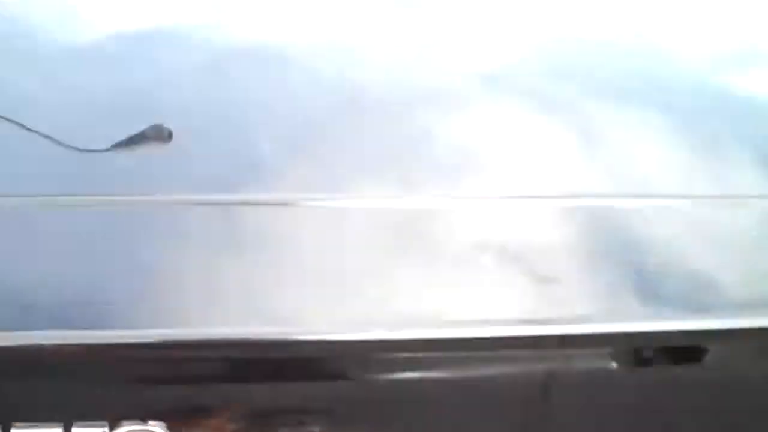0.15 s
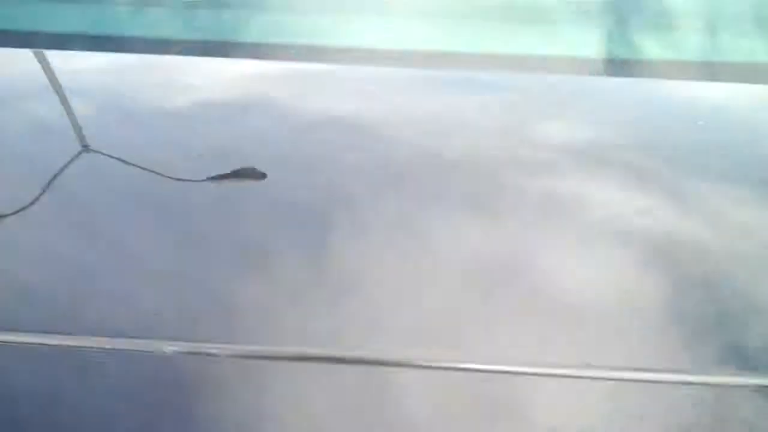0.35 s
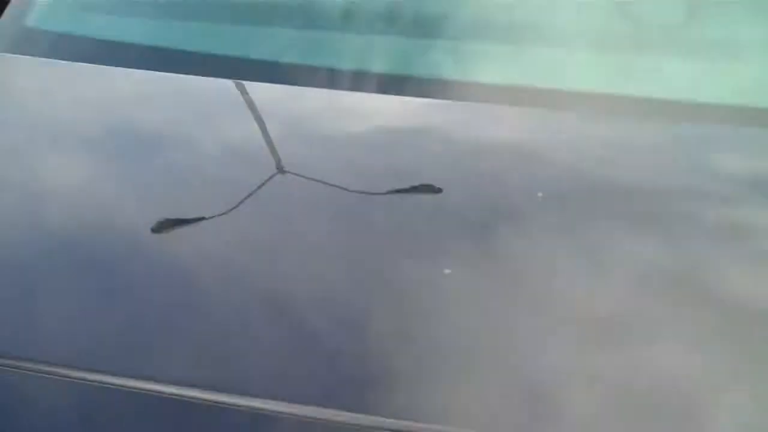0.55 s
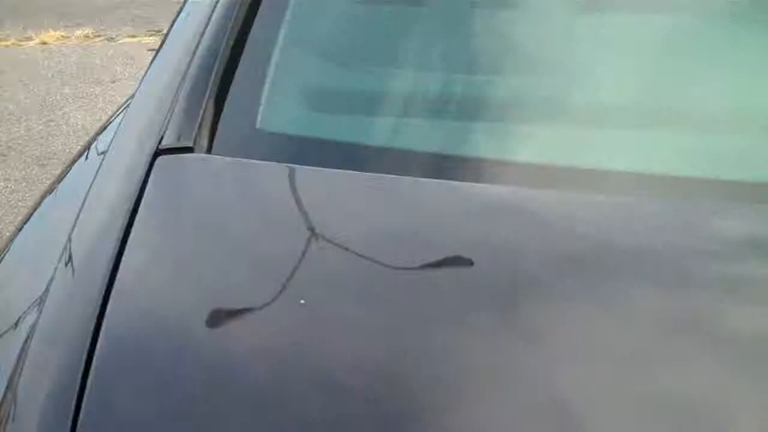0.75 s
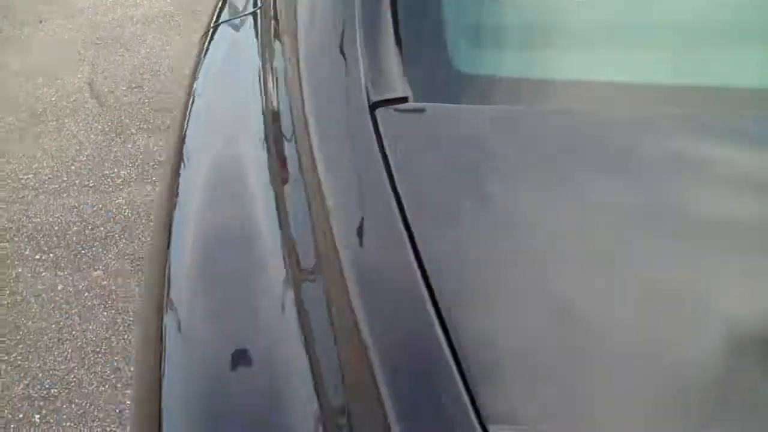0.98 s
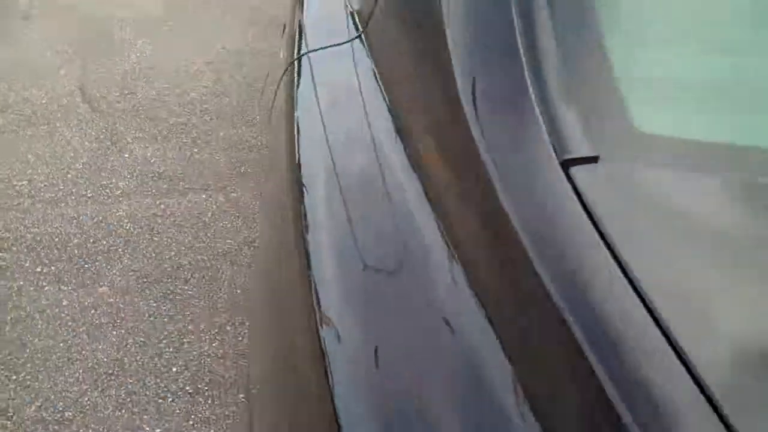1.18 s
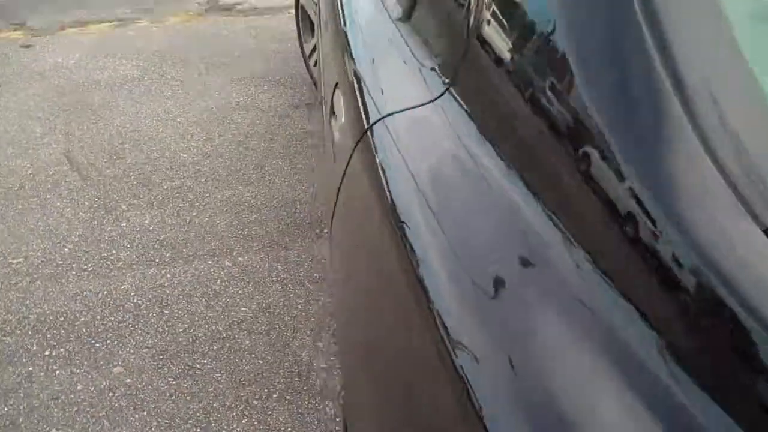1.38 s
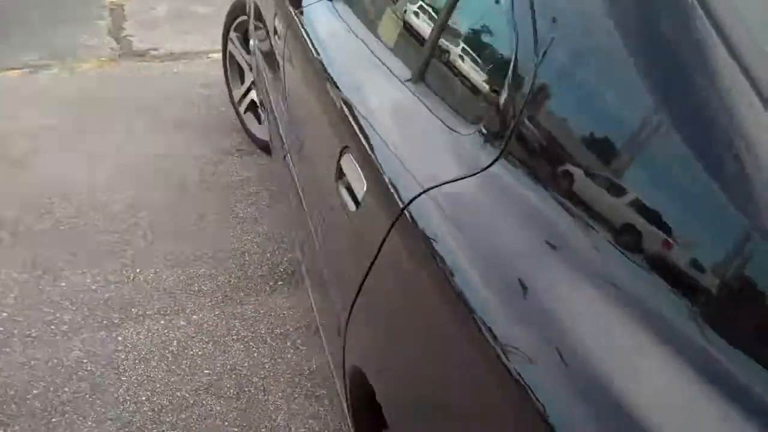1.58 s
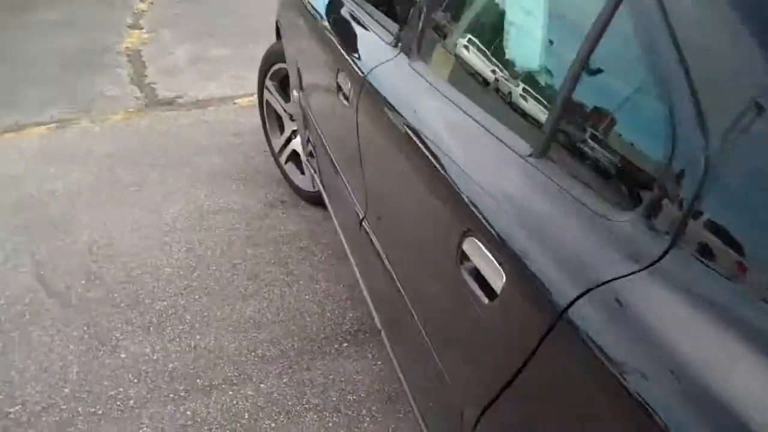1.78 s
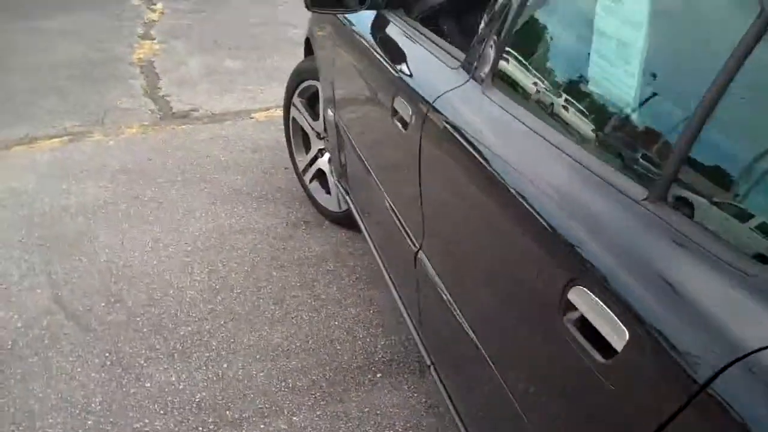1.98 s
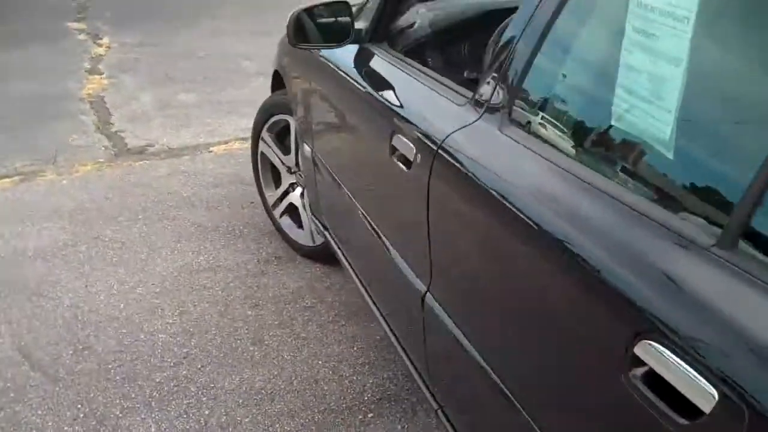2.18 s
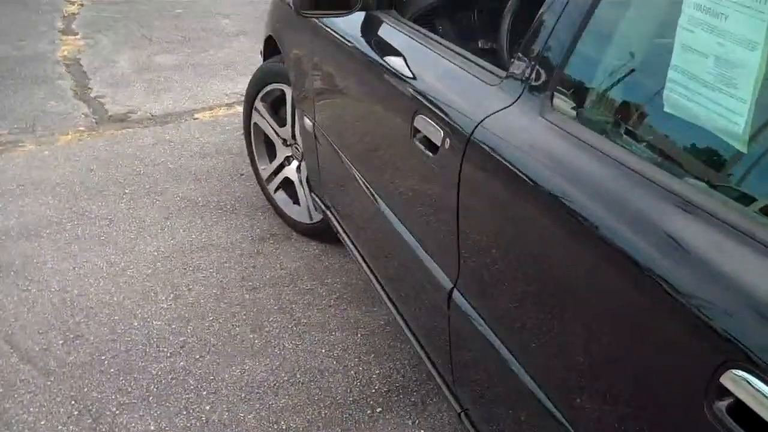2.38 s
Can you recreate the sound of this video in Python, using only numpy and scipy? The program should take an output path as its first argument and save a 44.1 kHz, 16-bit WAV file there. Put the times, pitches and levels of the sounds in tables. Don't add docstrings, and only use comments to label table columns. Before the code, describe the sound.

A car trunk lid slams shut with one loud, heavy metallic thump in an open parking lot

```python
import sys
import numpy as np
from scipy import signal
from scipy.io import wavfile
from scipy.ndimage import uniform_filter1d

SR = 44100
rng = np.random.default_rng(int(sys.argv[2]) if len(sys.argv) > 2 else 0)


def log_audio(samples):
    frames = np.atleast_2d(samples).T
    limited = np.clip(frames, -1, 1)
    pcm = np.round(limited * 32767).astype(np.int16)
    wavfile.write(sys.argv[1], SR, pcm)


def linear_from_db(decibels):
    return 10 ** (np.asarray(decibels, float) / 20)


N = 108045

# frequency in Hz, likeness from -1 to 1.
AIR_LIKENESS = [(60, 0.79), (180, 0.93), (530, 0.96), (1580, 0.71), (4710, -0.031), (14000, 0.02)]
# frequency in Hz, left minus right in dB.
AIR_BALANCE = [(60, -3), (180, -0.5), (530, 0.5), (1580, -1.5), (4710, 0.5), (14000, 16.5)]


def evened(x):
    return x / np.sqrt(np.mean(x ** 2) + 1e-20)


def read(points, hz):
    f, value = np.transpose(points)
    return np.interp(np.log(hz + 1), np.log(f + 1), value)


def add(mix, start_s, sound):
    part = mix[..., round(start_s * SR):][..., :sound.shape[-1]]
    part += sound[..., :part.shape[-1]]


def sides(pan_db):
    return linear_from_db(np.array([pan_db / 2, -pan_db / 2]))


def slow(rate_hz):
    t = np.arange(N) / SR
    drift = np.zeros(N)
    for hz in np.geomspace(rate_hz / 16, rate_hz, num=16):
        drift += np.sin(2 * np.pi * (hz * t + rng.random())) / np.sqrt(hz)
    return evened(drift)


def noise(colour, likeness, balance, patchy_db, size=1024):
    frames, hz = 4 * N // size + 5, np.fft.rfftfreq(size, 1 / SR)
    a, b, c, d, patches = rng.standard_normal((frames, len(hz), 5)).T
    patches = uniform_filter1d(patches, size=10, axis=0)
    patches = evened(uniform_filter1d(patches, size=10, axis=1))
    like = np.clip(read(likeness, hz), -1, 1)[:, None]
    left, other = a + 1j * b, c + 1j * d
    z = np.array([left, like * left + np.sqrt(1 - like ** 2) * other])
    z *= sides(read(balance, hz))[..., None]
    z *= linear_from_db(read(colour, hz)[:, None] + patchy_db * patches)
    return evened(signal.istft(z, nperseg=size, noverlap=3 * size // 4)[1][:, :N])


def traffic():
    # frequency in Hz, density in dB per Hz.
    wash_colour = [(24, -31), (40, -3), (260, -10), (430, -18.5), (1060, -18), (4000, -37), (5800, -35),
                   (9800, -54), (14200, -60.5), (14800, -85)]
    # time in seconds, loudness in dB.
    swell = [(0, 0.5), (.15, 1.5), (.5, 0.5), (.8, -1), (1.1, -0.5), (1.35, 0), (1.7, -0.5), (2.0, -0.5),
             (2.45, .5)]
    t = np.arange(N) / SR
    wash_db = -39.5 + np.interp(t, *np.transpose(swell)) + .3 * slow(9)
    wash = noise(wash_colour, AIR_LIKENESS, AIR_BALANCE, .8) * linear_from_db(wash_db)

    idle_hz = 30.8 * (1 + 0.025 * slow(3.3))
    idle = np.sin(2 * np.pi * np.cumsum(idle_hz) / SR) * linear_from_db(-39 - 3.1 * slow(1.7))

    hum_db = -56.5 + 3.6 * np.sin(2 * np.pi * 3.3 * t)
    hum_waver = 0.91 * np.sin(2 * np.pi * 6.5 * t)
    hum = linear_from_db(hum_db) * np.sin(2 * np.pi * 498 * t + hum_waver)
    return wash + hum + idle * sides(-4.5)[:, None]


def insects():
    # frequency in Hz, density in dB per Hz.
    chorus = [(5900, -13.5), (6300, 1.5), (7000, 0), (7600, 5.5), (7950, 2), (8200, -13), (9000, -17),
              (9600, -40.5)]
    band = [(100, -90), *chorus, (20000, -90)]
    hiss = noise(band, AIR_LIKENESS, AIR_BALANCE, 1.4, size=512)
    return hiss * linear_from_db(-48 + 0.5 * slow(90) + 1.4 * slow(9.4))


def ticks():
    # start in seconds, level in dB, lowest and highest frequency in Hz, left minus right in dB.
    clicks = [
        (.1565, -29, 5640, 8900, 10),
        (.1566, -46, 8900, 15100, 14),
        (0.162, -31.5, 5500, 9020, 0.5),
        (.175, -45, 9050, 14500, 12),
        (.187, -51, 10000, 14000, 11.5),
        (.2005, -29, 5000, 9600, 7),
        (1.4, -58, 4000, 12100, 15),
        (1.686, -54, 7000, 11000, 11),
        (1.921, -35, 2300, 6700, 0.5),
    ]
    out, t = np.zeros((2, N)), np.arange(2000) / SR
    t60_s = .009
    for start_s, db, low_hz, high_hz, pan_db in clicks:
        band = signal.butter(3, [low_hz, high_hz], "band", fs=SR, output="sos")
        impulse = 8 * (t == 0)
        a, b = (rng.standard_normal((2, len(t))) + impulse) * linear_from_db(-60 * t / t60_s)
        snap = signal.sosfilt(band, [a, 0.47 * a + 0.35 * b])
        add(out, start_s, linear_from_db(db + 6.5) * snap / abs(snap).max() * sides(pan_db)[:, None])
    return out


def seal():
    length_s, top_hz = 0.019, 2984
    out, t = np.zeros((2, N)), np.arange(0, length_s, 1 / SR)
    a, b = rng.standard_normal((2, len(t)))
    lowpass = signal.butter(2, top_hz, fs=SR, output="sos")
    squeeze = signal.sosfilt(lowpass, [a + 0.31 * b, a - 0.84 * b])
    add(out, .191, linear_from_db(-13.5) * evened(squeeze) * (t / length_s) ** 1.5)
    return out


def rattle(shudder):
    # frequency in Hz, density in dB per Hz.
    crash_colour = [(180, -37), (300, -6), (800, -7.5), (1100, -11.5), (2000, -13), (7800, -16.5),
                    (13500, -42.5), (14600, -50)]
    # frequency in Hz, left minus right in dB.
    crash_balance = [(60, -3.5), (500, -0.5), (4700, 1), (7000, 6), (8500, 7), (14000, 13.5)]
    # frequency in Hz, left-right likeness.
    crash_likeness = [(300, 0.99), (1000, .9), (3000, 0.69), (8000, 0.15)]
    # frequency in Hz, width in Hz, boost in dB.
    ports = [(7400, 970, 3), (12480, 660, 13)]
    hz = np.geomspace(100, 20000, num=200)
    colour = read(crash_colour, hz)
    for port_hz, width_hz, db in ports:
        colour = colour + db * np.exp(-((hz - port_hz) / width_hz) ** 2)
    grain = linear_from_db(1.7 * evened(uniform_filter1d(rng.standard_normal(N), size=60)))
    crash = noise(np.transpose([hz, colour]), crash_likeness, crash_balance, 4.1, size=256)
    return linear_from_db(1.5) * shudder * grain * crash


def ring(force, hz, t60_s):
    t = np.arange(SR // 2) / SR
    return signal.fftconvolve(force, linear_from_db(-60 * t / t60_s) * np.sin(2 * np.pi * hz * t))[:N]


def sheet_metal(force_knocks, shudder):
    # frequency in Hz, level in dB, 60 dB decay time in seconds.
    modes = [(56.3, -5, 0.17), (97, -4, 0.22), (187.4, -10, .3), (235.9, -3, 0.33), (271.4, -1, 0.2),
             (394.5, -4.5, 0.096), (450, -6.5, 0.063), (590, -14, 0.081), (666, 0, 0.073),
             (739.7, 2.5, .09), (858, -1, 0.057), (903, -2, .06), (1153, -4.5, .06), (1305, -4.5, 0.051)]
    out, lag_s = np.zeros((2, N)), .00008
    for hz, db, t60_s in modes:
        force = force_knocks * .5 + 0.017 * shudder * rng.standard_normal(N)
        mode = linear_from_db(db - 3) * ring(force, hz, t60_s)
        place = rng.uniform(-1, 1)
        late = np.interp(np.arange(N) - SR * lag_s * (1 + place), np.arange(N), mode)
        out += np.array([late, mode]) * sides(-0.5 * place - 0.6)[:, None]
    return out


def slam():
    # start in seconds,
    # knock in dB, rattle in dB, shudder length in seconds.
    blows = [(0.2046, -10, -21.5, 0.0047), (0.2087, -2.5, 2.5, 0.0087), (0.2147, 1, 2.5, .006),
             (.222, -1.5, -2.5, 0.0056), (0.229, -2, -8, 0.0056), (0.234, -7.5, -10.5, .005),
             (0.251, -7, -14, 0.0038), (.257, -9, -10, 0.004), (.27, -11.5, -12.5, .008),
             (0.283, -20.5, -26, .005), (.298, -24, -21, 0.0098), (.312, -22, -24.5, 0.0054),
             (0.341, -33.5, -30, 0.0098), (0.358, -23, -46, 0.013)]
    knocks, shudder, t = np.zeros(N), np.zeros(N), np.arange(4000) / SR
    for start_s, knock_db, rattle_db, length_s in blows:
        knocks[round(start_s * SR)] = linear_from_db(knock_db)
        rise = np.minimum(t / 0.00056, 1)
        add(shudder, start_s, linear_from_db(rattle_db) * rise * np.exp(-t / length_s))
    out = rattle(shudder) + sheet_metal(knocks, shudder)

    push_hz, push_s = 68.2, .2095
    u = (t - .008) * 2 * np.pi * push_hz
    push = linear_from_db(0.5) * u * np.exp(-u ** 2 / 2)
    add(out, push_s - .003, push * np.ones((2, 1)))
    return out


def lot(x):
    # frequency in Hz, 60 dB decay time in seconds.
    decay = [(100, 0.77), (500, 0.25), (2000, 0.22), (10000, .16)]
    taps = np.zeros((2, SR // 2))
    slots = np.arange(400, SR // 2 - 20, 20)
    at = slots + rng.integers(0, 20, (2, len(slots)))
    np.put_along_axis(taps, at, rng.choice([-1., 1.], at.shape), axis=1)
    taps = taps + 1.3 * taps[::-1]
    hz, t, z = signal.stft(taps, SR, nperseg=256)
    fade = linear_from_db(-60 * t / read(decay, hz)[:, None])
    tail = signal.istft(z * fade, SR, nperseg=256)[1]
    return signal.fftconvolve(x, tail / np.linalg.norm(tail[0]), axes=1)[:, :N]


def birds():
    # start in seconds, length in seconds, level in dB, start and end frequency in Hz.
    whistles = [
        (.505, .025, -54, 2480, 2450),
        (1.66, .12, -59, 6450, 6300),
        (1.965, .035, -60, 3150, 3200),
        (2.16, .035, -61, 3800, 3800),
        (2.215, .03, -62, 3800, 3850),
        (2.255, .045, -61, 4080, 4200),
        (2.315, .065, -58, 4250, 4330),
        (2.385, .03, -63, 4350, 4420),
        (2.39, .055, -53, 2950, 3080),
    ]
    out = np.zeros((2, N))
    for start_s, length_s, db, start_hz, end_hz in whistles:
        t = np.arange(0, length_s, 1 / SR)
        waver = 1 + .003 * np.sin(2 * np.pi * 45 * t)
        hz = (start_hz + (end_hz - start_hz) * t / length_s) * waver
        swell = np.sin(np.pi * t / length_s) ** 0.41
        whistle = linear_from_db(db) * swell * np.sin(2 * np.pi * np.cumsum(hz) / SR)
        add(out, start_s, whistle * np.ones((2, 1)))

    length_s, chirps_per_s, duty = 0.11, 200, .7
    t = np.arange(0, length_s, 1 / SR)
    cycle = t * chirps_per_s % 1
    hz = 5500 + 1576 * cycle / duty + 932 * np.exp(-t / 0.012)
    chirp = np.sin(np.pi * np.minimum(cycle / duty, 1))
    envelope = np.sin(np.pi * (t / length_s) ** 1.3) ** .3
    buzz = linear_from_db(-36) * chirp * envelope * np.sin(2 * np.pi * np.cumsum(hz) / SR)
    add(out, 1.13, buzz * sides(1.9)[:, None])
    return out + linear_from_db(-5.5) * lot(out)


def bumps():
    # start in seconds, level in dB, frequency in Hz.
    thuds = [
        (1.07, -33, 150),
        (1.085, -30, 210),
        (1.094, -28.5, 119),
        (1.096, -29.5, 76.2),
    ]
    out, t = np.zeros((2, N)), np.arange(6000) / SR
    t60_s = 0.1
    for start_s, db, hz in thuds:
        thud = linear_from_db(db - 60 * t / t60_s) * np.sin(2 * np.pi * hz * t)
        add(out, start_s, thud * sides(-12.5)[:, None])
    return out


def scene():
    lid = seal() + slam()
    return traffic() + insects() + ticks() + lid + linear_from_db(-12.5) * lot(lid) + birds() + bumps()


def top_cut(x):
    return signal.sosfilt(signal.butter(12, 14630, fs=SR, output="sos"), x)


def record(dry):
    duck_from_db, duck_share, back_db_s, lag_s, ceiling = -18, 0.52, 13, 0.039, 0.94
    power = abs(uniform_filter1d((dry ** 2).mean(0), size=400))
    power_db = 10 * np.log10(power + 1e-12)
    fall_db = np.arange(N) * back_db_s / duck_share / SR
    held_db = np.maximum.accumulate(power_db + fall_db) - fall_db
    over_db = np.maximum(held_db - duck_from_db, 0)
    keep = np.exp(-1 / (lag_s * SR))
    duck_db = duck_share * signal.lfilter([1 - keep], [1, -keep], over_db)
    return top_cut(np.clip(dry / linear_from_db(duck_db), -ceiling, ceiling))


dry = scene()
out = record(dry)
log_audio(out)
```